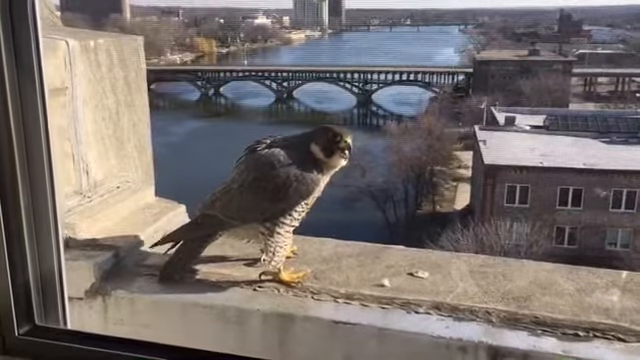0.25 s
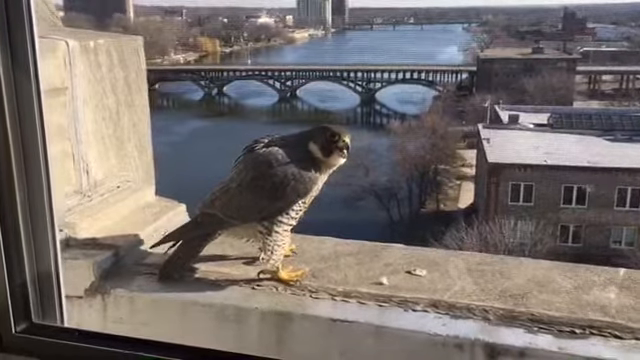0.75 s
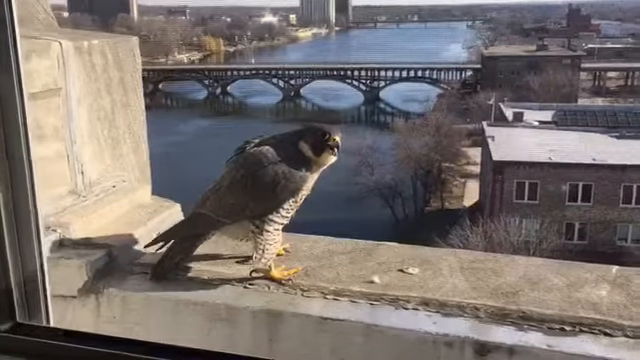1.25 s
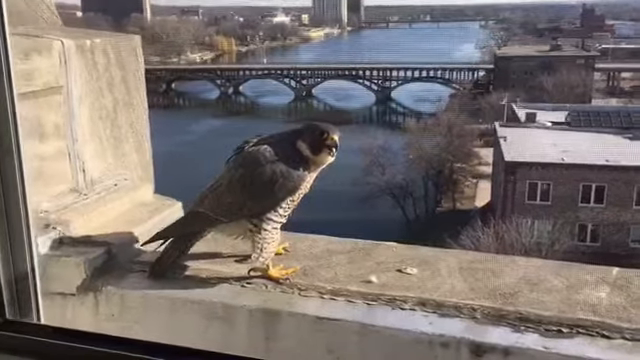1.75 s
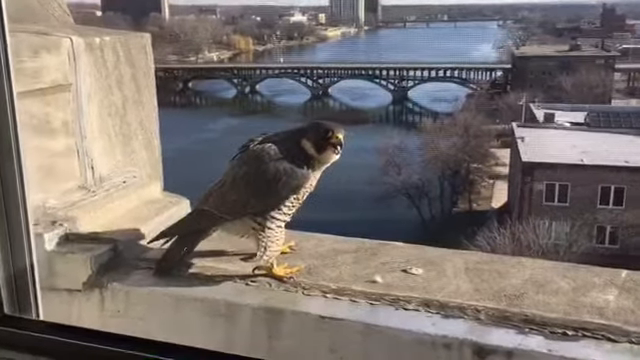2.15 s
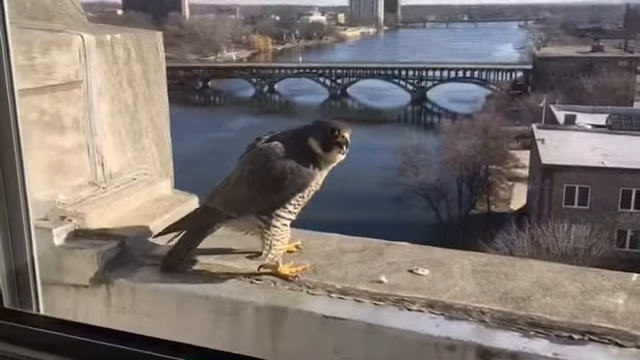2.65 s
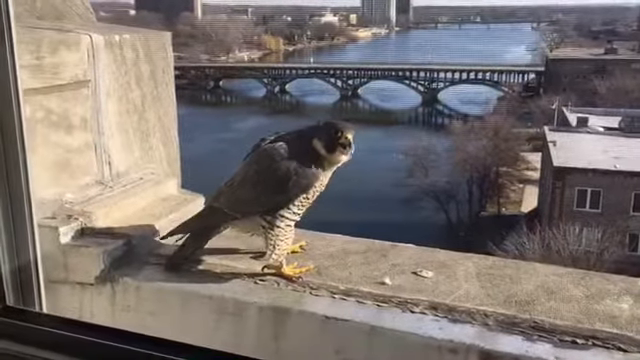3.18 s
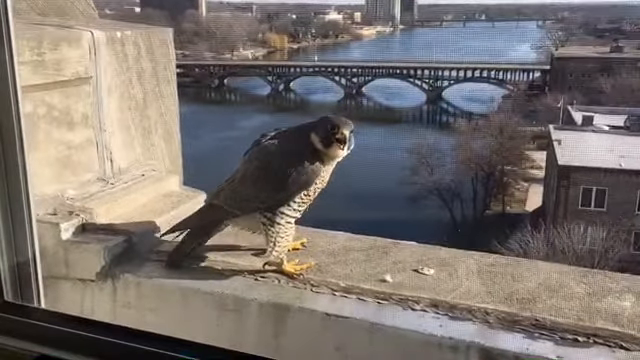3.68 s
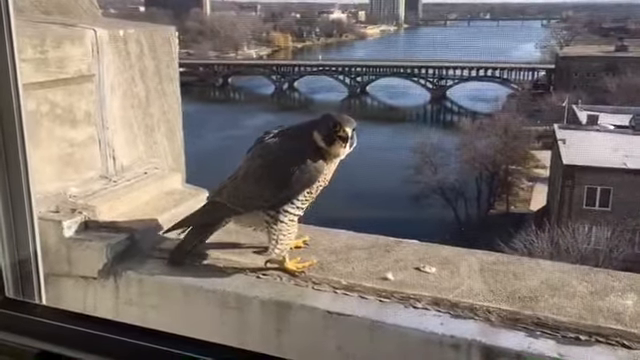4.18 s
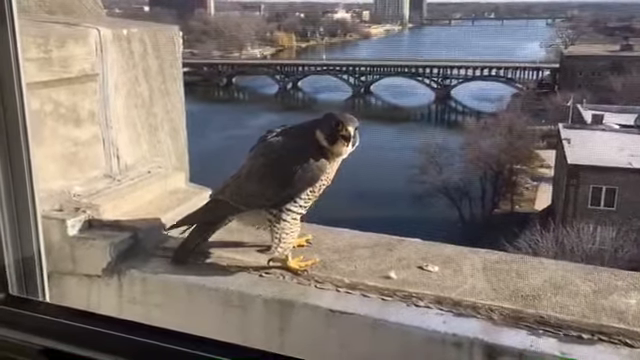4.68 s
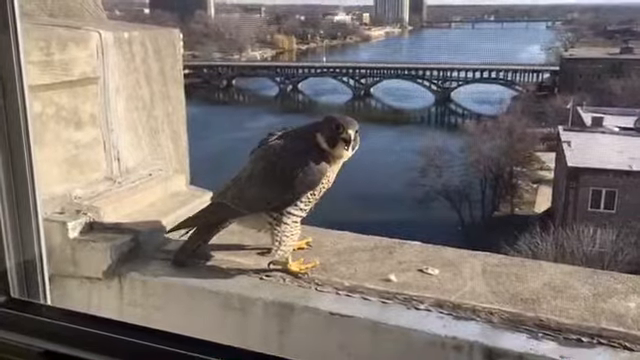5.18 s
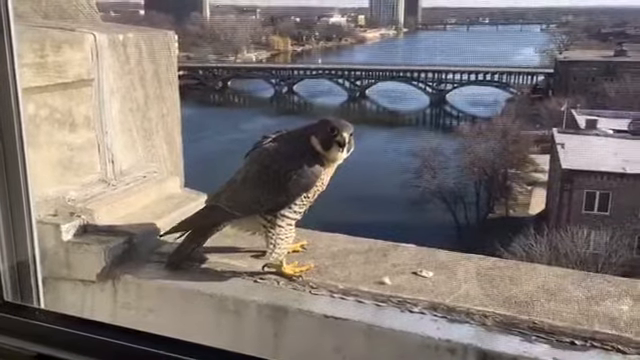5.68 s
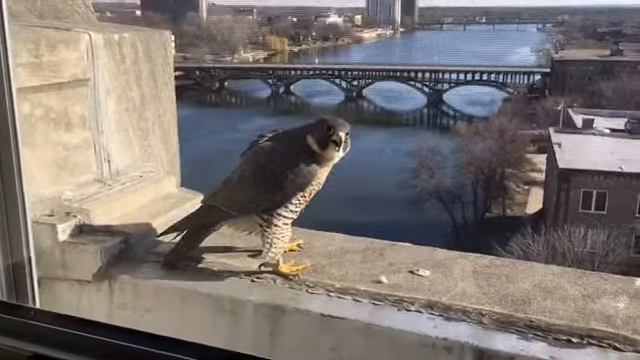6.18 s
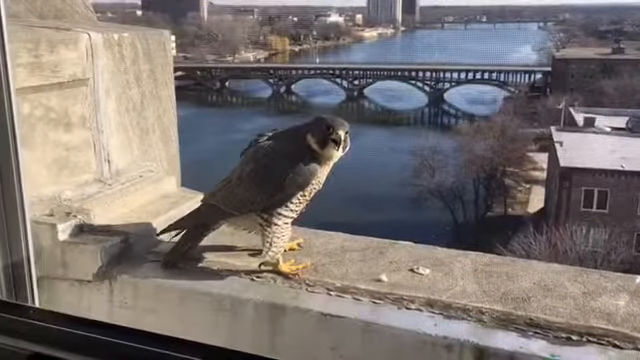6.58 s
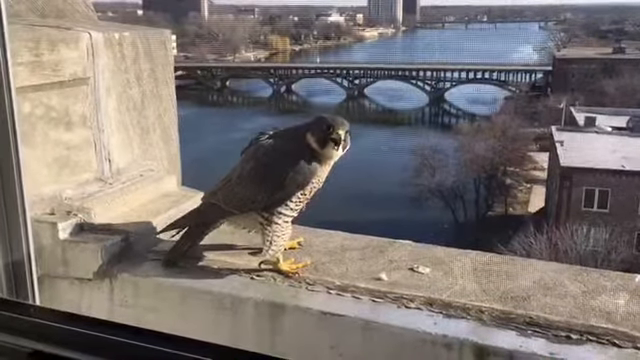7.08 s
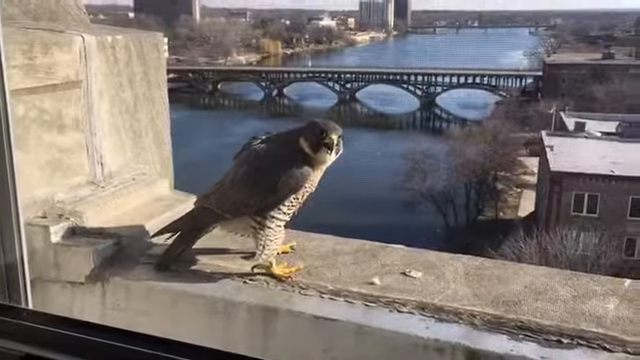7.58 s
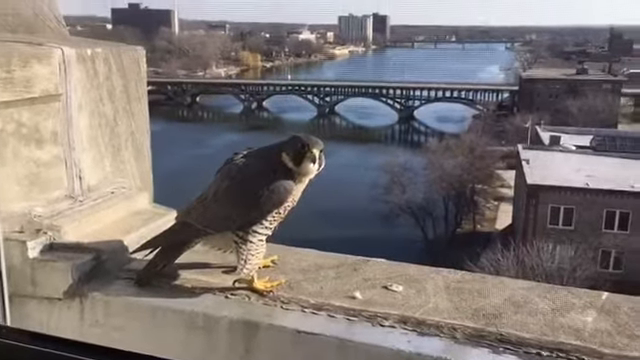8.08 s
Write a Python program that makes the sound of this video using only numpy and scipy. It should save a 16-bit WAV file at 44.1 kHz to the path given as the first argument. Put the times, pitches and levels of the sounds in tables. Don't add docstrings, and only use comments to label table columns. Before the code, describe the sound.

An unbroken row of raspy falcon alarm calls, already under way at the start and lasting to the end. Every note is about an eighth of a second long, shrill yet gritty, rising quickly and tearing into noise, with a tiny gap after it. The pace is even, easing slightly late on. Close pickup by a phone at a window, short room ring, soft low traffic wash and wavering hum far beneath.

```python
import sys
import numpy as np
from scipy import signal
from scipy.fft import rfft, irfft
from scipy.io import wavfile
from scipy.ndimage import uniform_filter1d

SR = 44100
rng = np.random.default_rng(int(sys.argv[2]) if len(sys.argv) > 2 else 0)


def attenuation_scalar(level_db):
    decades = np.asarray(level_db, float) / 20
    return 10 ** decades


def inscribe(sig):
    pcm = np.round(np.clip(np.atleast_2d(sig).T, -1, 1) * 32767)
    wavfile.write(sys.argv[1], SR, pcm.astype(np.int16))


N = 367794

# (start [s], breath before the voice [s], lock breaks after [s],
# whistle level locked [dB], whistle level in chaos [dB])
EARLY_NOTES = [(.002, .017, 0.063, -39.0, -39.5), (0.231, 0.021, 0.073, -39, -36.5),
               (.455, .013, 0.056, -38.5, -38.5), (0.682, 0.019, 0.068, -39.5, -37.5),
               (.904, 0.028, 0.08, -41, -39), (1.124, 0.02, 0.06, -37.0, -39),
               (1.348, 0.032, 0.071, -35.5, -35.5), (1.568, .025, 0.057, -36, -35.0),
               (1.786, 0.027, .066, -35, -35), (2.008, 0.018, .050, -39.5, -37.5),
               (2.223, .024, 0.055, -35.5, -35.5), (2.447, 0.0204, 0.0472, -40, -33.5),
               (2.659, .024, 0.049, -37.5, -35.5), (2.891, 0.023, 0.078, -39.5, -35.5),
               (3.1, 0.02, .054, -37.5, -40.5), (3.326, 0.02, 0.081, -40, -36.5),
               (3.555, 0.0202, .083, -39.0, -33)]
# (start [s], breath [s], break [s], locked [dB], chaos [dB])
LATE_NOTES = [(3.779, .021, 0.081, -37, -37.5), (4.014, 0.018, 0.083, -40, -32),
              (4.231, 0.0198, 0.057, -40, -37.5), (4.469, 0.019, 0.074, -40.0, -38.5),
              (4.697, .010, 0.066, -41.5, -37.5), (4.920, 0.014, 0.071, -39.5, -43),
              (5.159, .020, 0.081, -39, -36.5), (5.400, 0.017, 0.1, -38, -37.5),
              (5.637, 0.018, 0.077, -40.5, -48), (5.872, 0.026, 0.07, -38, -43),
              (6.105, 0.032, 0.096, -39.5, -40), (6.362, 0.01376, .068, -39, -37),
              (6.595, .021, 0.077, -41, -44), (6.831, .024, 0.094, -42.5, -46),
              (7.079, 0.018, 0.088, -40.5, -32.5), (7.320, .020, 0.063, -38, -40),
              (7.548, 0.024, .076, -37, -42.5)]
MOMENT_RASP_DB = [
    -48,
    -47,
    -44,
    -43,
    -41,
    -47.5,
]
MOMENT_WHISTLE_HZ = [
    1815,
    1876.5,
    2025,
    2056,
    2068,
    2007.4,
]
MOMENT_SLACK = [
    1,
    .45,
    .08,
    .12,
    .7,
    .85,
]
# (time [s], locked whistle shift [Hz], sag from lock to break [dB], opening puff [dB])
TENSION_DRIFT = [(0, 0, 3, 2), (.3, 30, -2, -3.0), (1, 0, 1.5, -3.5), (1.6, -15, -2, -3.5),
                 (2.3, 10, -1, -2.5), (3.1, -10, -1, -1), (3.8, 20, 5.5, 0.1), (4.3, -15, -9, 0.1),
                 (4.5, 15, 2, -1.5), (5.2, -20, -3, -1.0), (5.5, 5, 2, 0), (6.1, -25, 0, 0.1),
                 (6.6, -15, 0, -2.5), (7.1, -10, -1, 0.5), (7.6, 44.5, 6, 0.5)]
# (time [s], sizzle re rasp [dB], lift near third harmonic [dB])
BEAK_AIM = [(0, -10, 4.5), (.7, -10, 6.5), (1.4, -9, 5), (2, -11.5, 3), (2.6, -10.5, 2), (3.3, -9, 0.5),
            (4, -9.5, -1), (5.6, -10, 0), (6.4, -10, -2.5), (7.8, -9.5, -0.5)]
# (multiple of pitch [1], level locked [dB], level broken [dB])
WHISTLE_PARTIALS = [(.25, -23.5, -25), (1, -14, -17.5), (2, 2, -1), (2.25, -11, -8.5), (3, -15, -14.5),
                    (4, -15.5, -21.5), (6, -47, -34.5)]
# (frequency [Hz], density [dB per Hz])
THROAT_RESPONSE = [(350, -69.5), (600, -47), (928, -23.5), (1030, -6), (1150, -21.5), (1360, -19.5),
                   (1450, -23), (2070, -2.5), (2950, -19), (3820, -18), (4880, -29), (5520, -22),
                   (6410, -35.5), (8890, -28), (15500, -55.5)]
# (frequency [Hz], width [Hz], lift [dB])
FINE_RESONANCES = [(1084, 23, 7), (1335, 40, 15), (1566, 156, 11), (2092, 59, 8), (2395, 47, 9.5),
                   (2557, 34, 9), (2776, 83, 13.5), (3082, 63, 10.5), (3693, 63, 11), (3870, 126, 6.5),
                   (5990, 350, 4.5), (10510, 460, -14), (14200, 900, 15)]
# (frequency [Hz], width [Hz], level [dB])
GASP_BANDS = [(1508, 600, -0.5), (2160, 460, 1), (2660, 660, -10.5), (5640, 820, -26)]
# (frequency [Hz], level [dB], t60 [s])
ROOM_RINGS = [
    (2088, -27, 0.053),
    (2440, -40, 0.35),
]
# (frequency [Hz], density [dB per Hz])
CITY_SPECTRUM = [(12, -40), (20, -22), (59, -7), (109, -1), (219, -16), (315, -15.5), (342, -24),
                 (535, -29), (650, -32.5), (790, -30.5), (1300, -32), (1420, -34.5), (1540, -34),
                 (14300, -55.5), (15500, -64)]
# (frequency [Hz], width [Hz], level [dB])
MACHINE_DRONES = [(54.2, 8.05, -55.5), (77.1, 10.7, -60), (118.9, 10.47, -58.5), (234.5, 14.26, -69),
                  (301.3, 26.98, -69.5)]
# (time [s], first [dB], second [dB], third [dB])
DRONE_SWELLS = [(0, -56, -43, -53), (.7, -51, -64, -56.5), (1.6, -55, -68, -59.5), (2.4, -58.5, -63, -54.5),
                (3.6, -50.5, -53, -54.5), (4.5, -53, -47.5, -53.5), (5.5, -58.5, -53.5, -55.5),
                (6.5, -51.5, -59, -51.5), (7.502, -55, -59, -48), (8.34, -56, -58, -59)]
# (frequency [Hz], level [dB])
THIN_WHINES = [(1393, -78), (1741, -78.5)]
# (time [s], cancellations so far [1])
MOTOR_BEATS = [(-.12, 0), (.55, 2), (2.31, 8), (2.87, 10), (3.54, 12), (5.5, 19), (6.17, 21), (7.95, 28),
               (8.55, 30)]


def falcon(t):
    rasp_db, whistle_hz, whistle_db, loose = controls(t)
    loose = np.clip(loose, 0, 1)
    quaver = 0.004
    cycles = np.cumsum(whistle_hz / 2 * (1 + quaver * walk(60))) / SR
    beak_s, *beak = np.transpose(BEAK_AIM)
    sizzle_db, third_db = (np.interp(t, beak_s, column) for column in beak)

    rough = rasp(t, cycles, loose)
    rough /= np.std(band(rough, 2200, 4400))
    low = beak_low(rough, loose, third_db)
    high = beak_high(rough, t, loose, third_db)

    dull = np.clip((loose - 0.7) / 0.3, 0, 1)
    air = np.clip((loose - 0.8) / 0.2, 0, 1)
    gasp = sum(attenuation_scalar(db) * unit(band(rng.standard_normal(N), hz - width_hz / 2, hz + width_hz / 2))
               for hz, width_hz, db in GASP_BANDS)
    voice = attenuation_scalar(-0.5 - 7.1 * (1 - loose) - 8.1 * air) * low
    voice += attenuation_scalar(sizzle_db + 2.4 * (1 - loose) - 10.8 * dull) * high
    whistle = attenuation_scalar(whistle_db - 1) * tone(cycles, loose, third_db)
    return whistle + attenuation_scalar(rasp_db) * (voice + air * gasp)


def tone(cycles, loose, third_db):
    waver = cycles + 0.07 * loose ** 2 * walk(400) + 0.006 * walk(120)
    size = attenuation_scalar(3.5 * loose ** 2 * walk(450) + 0.6 * walk(120))
    total = np.zeros(N)
    for k, locked_db, broken_db in WHISTLE_PARTIALS:
        level_db = locked_db + loose * (broken_db - locked_db)
        level_db = level_db + (k != 2) * 3.6 * walk(25) + (k == 3) * third_db
        total += attenuation_scalar(level_db) * np.sin(2 * np.pi * k * waver + k * k)
    return np.sqrt(2) * size * total


def rasp(t, cycles, loose):
    k = np.arange(1, int(cycles[-1]))
    snap_s = np.interp(k, cycles, t)
    slack = np.interp(snap_s, t, loose)
    size_chance, time_chance = rng.uniform(-1.7, 1.7, (N // 20, 2))[:len(k)].T

    starts = [note[0] for note in EARLY_NOTES + LATE_NOTES]
    pattern = np.array([1.62, -0.6, -0.2, 0.048]) + 0.5 * rng.standard_normal((len(starts) + 1, 4))
    pattern /= np.sqrt(np.mean(pattern ** 2, axis=1, keepdims=True))
    size = np.sqrt(1 - slack) * pattern[np.searchsorted(starts, snap_s), k % 4]
    size += np.sqrt(slack) * size_chance

    jitter_s = (0.000004 + 0.00008 * slack) * time_chance
    place = np.clip((snap_s + jitter_s) * SR, 8, N - 9)
    near = np.floor(place)[:, None] + np.arange(-7, 9)
    gap = near - place[:, None]
    pulses = size[:, None] * np.sinc(gap) * np.sinc(gap / 8)
    snaps = np.bincount(near.astype(int).ravel(), pulses.ravel(), N)
    breath = 0.7 * (0.12 + loose) * rng.standard_normal(N)

    throat_db = shape(THROAT_RESPONSE)

    def gain_db(hz):
        lift_db = sum(db / (1 + (2 * (hz - f_hz) / width_hz) ** 2) for f_hz, width_hz, db in FINE_RESONANCES)
        return throat_db(hz) + lift_db

    return colour(unit(snaps) + breath, gain_db)


def beak_low(rough, loose, third_db):
    low = signal.sosfilt(signal.butter(N=4, Wn=4500, fs=SR, output="sos"), rough)
    low += (attenuation_scalar(third_db) - 1) * band(rough, 2750, 3300)
    low -= 0.6 * (1 - loose) * band(rough, 1100, 1900)
    gape = np.clip(loose - 0.3, 0, 1)
    low += gape * (1.04 * band(rough, 2117, 2800) - 0.53 * band(rough, 3380, 4350))
    return low


def beak_high(rough, t, loose, third_db):
    rattle = rng.standard_normal(1024) * attenuation_scalar(-60 * t[:1024] / 0.025)
    rattle[0] = 6.4
    spectrum = rfft(rattle)
    rattle = irfft(spectrum / np.sqrt(uniform_filter1d(np.abs(spectrum) ** 2, size=5)))
    high = signal.sosfilt(signal.butter(N=4, Wn=4500, btype="high", fs=SR, output="sos"), rough)
    high = 1.142 * unit(signal.fftconvolve(high, rattle)[:N])
    top = band(high, 10400, 15600)
    mid = band(high, 4700, 6140)
    top_gain = attenuation_scalar(0.59 * (-1 - loose) + 0.63 * third_db) - 1
    mid_gain = attenuation_scalar(0.36 * third_db + 2.5) - 1
    return high + top_gain * top + mid_gain * mid


def controls(t):
    usual_pace_s = 0.229
    surge = 0.24
    notes = EARLY_NOTES + LATE_NOTES
    paces_s = [*np.diff([row[0] for row in notes]), usual_pace_s]
    rows = []
    for row, pace_s in zip(notes, paces_s):
        note = moments(*row, pace_s - usual_pace_s)
        # s, rasp dB, whistle Hz, whistle dB, slack
        puff = [note[0] + (-0.008, -24, 0, -30, 0), note[0] + (-0.0035, -2.5, 0, -8, 0)]
        scoop = note[1] + (-0.45 * row[1], -2.5, -80, -13, 0.45)
        change = note[4] - note[3]
        torn = note[3] + change * 0.26
        torn[[1, 3]] = (note[3] + change * surge)[[1, 3]]
        torn[4] = MOMENT_SLACK[4]
        sigh = [note[5] + (0.0482, -20.5, -40, -49, 0.15), note[5] + (0.0873, -32, -60, -40, -1.7)]
        rows += [*puff, scoop, *note[1:4], torn, *note[4:], *sigh]
    s, *columns = np.transpose(rows)
    return [np.interp(t, s, column) for column in columns]


def moments(start, breath, broken, locked_db, torn_db, extra_pace_s):
    lock_s, chaos_s, tear_s = 0.024, 0.031, 0.01502
    tense_hz_per_s, tense_db_per_s = 3400, 252
    breath_db, entry_db, spent_db = -58, -45.5, -45.5
    effort = 0.24

    length_s = 0.131 + 0.6 * extra_pace_s
    drift_s, *drift = np.transpose(TENSION_DRIFT)
    shift_hz, sag_db, puff_db = (np.interp(start, drift_s, column) for column in drift)
    s = [0, breath, min(breath + lock_s, broken - 0.01), broken,
         max(length_s - chaos_s, broken + tear_s), length_s]
    tense_hz = tense_hz_per_s * breath
    hz = np.add(MOMENT_WHISTLE_HZ, [tense_hz, tense_hz, shift_hz, shift_hz, shift_hz / 2, 0])
    whistle_db = [breath_db, entry_db + tense_db_per_s * breath, locked_db - sag_db / 2,
                  locked_db + sag_db / 2, torn_db, spent_db]
    rasp_db = np.add(MOMENT_RASP_DB, [puff_db, 0, 0, 0, effort * (torn_db - locked_db), 0])
    return np.column_stack([np.add(start, s), rasp_db, hz, whistle_db, MOMENT_SLACK])


def room(x, t):
    t = t[:SR]

    def fade(t60_s):
        return attenuation_scalar(-60 * t / t60_s) * np.sqrt(2 * np.log(1000) / t60_s / SR) * (t > 0.004)

    wash = attenuation_scalar(-12) * fade(0.15) + attenuation_scalar(-26.5) * fade(1.4)
    tail = band(rng.standard_normal(SR), 470, 5500) * wash
    tail += sum(attenuation_scalar(db) * fade(t60_s) * np.sin(2 * np.pi * hz * t) for hz, db, t60_s in ROOM_RINGS)
    return signal.fftconvolve(x, tail)[:N]


def city(t):
    out = attenuation_scalar(-51.5 + walk(1.565)) * unit(colour(rng.standard_normal(N), shape(CITY_SPECTRUM)))
    swell_s, *swells = np.transpose(DRONE_SWELLS)
    levels_db = [np.interp(t, swell_s, column - np.mean(column)) for column in swells]
    levels_db += [2.0 * walk(2.07) for _ in MACHINE_DRONES[3:]]
    for (hz, width_hz, db), swell_db in zip(MACHINE_DRONES, levels_db):
        cycles = np.cumsum(hz + width_hz / 5 * walk(25)) / SR
        out += attenuation_scalar(db + swell_db + 2.17 * walk(14)) * np.sqrt(2) * np.sin(2 * np.pi * cycles)
    out += sum(attenuation_scalar(db + 2.0 * walk(6.1)) * np.sin(2 * np.pi * hz * t) for hz, db in THIN_WHINES)
    return out


def motors(t):
    motor_hz, start_db, end_db = 547, -69, -75
    beat = np.sin(np.pi * np.interp(t, *np.transpose(MOTOR_BEATS)))
    level_db = np.interp(t, t[[0, -1]], (start_db, end_db)) + 3
    return attenuation_scalar(level_db) * beat * np.sin(2 * np.pi * motor_hz * t)


def unit(x):
    return x / np.sqrt(np.mean(x ** 2))


def walk(rate_hz):
    hold = max(int(SR / rate_hz), 9)
    steps = rng.standard_normal(N // 8)[np.arange(N) // hold]
    return unit(uniform_filter1d(uniform_filter1d(steps, hold), hold))


def colour(x, gain_db):
    cepstrum = irfft(gain_db(np.arange(4097) * SR / 8192 + 1) * np.log(10) / 20)
    cepstrum[1:4096] *= 2
    response = irfft(np.exp(rfft(cepstrum[:4097], 8192)))
    return signal.fftconvolve(x, response)[:N]


def shape(table):
    point_hz, point_db = np.transpose(table)
    return lambda hz: np.interp(np.log(hz), np.log(point_hz), point_db)


def band(x, lo_hz, hi_hz):
    return signal.sosfilt(signal.butter(N=3, Wn=[lo_hz, hi_hz], btype="band", fs=SR, output="sos"), x)


def scene():
    t = np.arange(N) / SR
    bird = falcon(t)
    return (bird + room(bird, t) + city(t) + motors(t))[None]


def band_limit(x):
    return signal.sosfilt(signal.butter(12, 15690, fs=SR, output="sos"), x)


def record(dry):
    return band_limit(dry)


dry = scene()
out = record(dry)
inscribe(out)
```